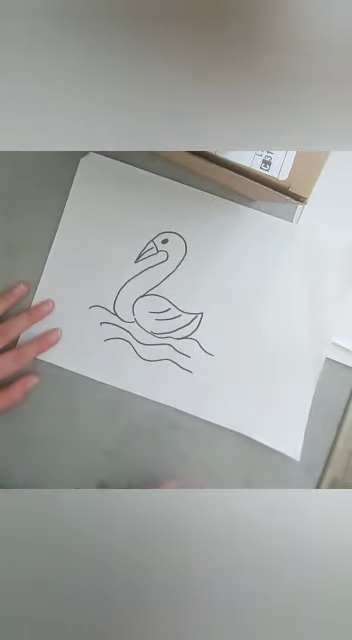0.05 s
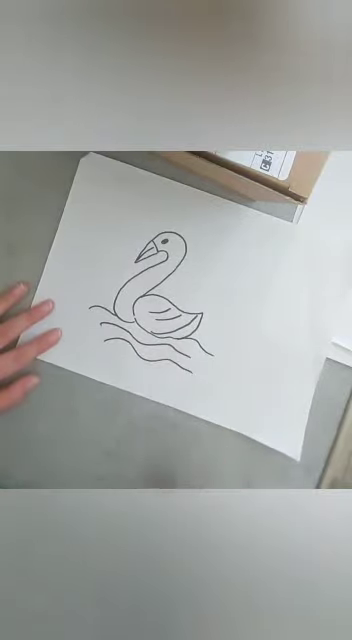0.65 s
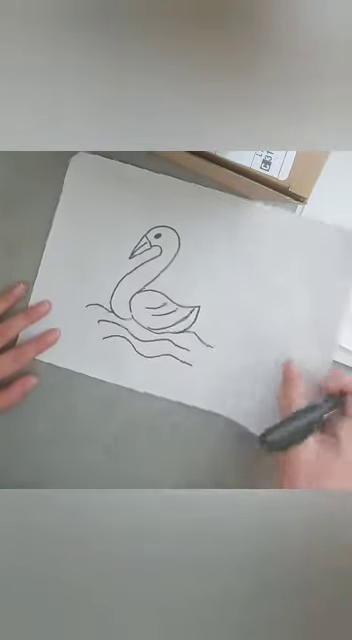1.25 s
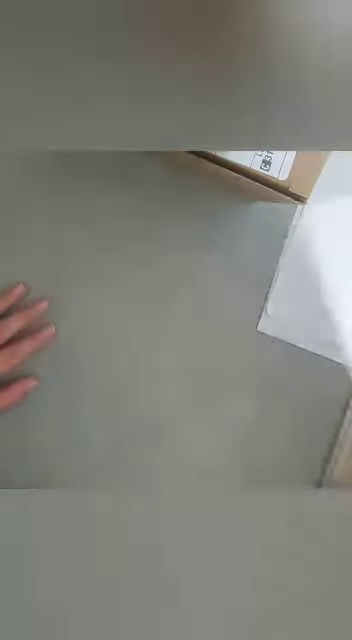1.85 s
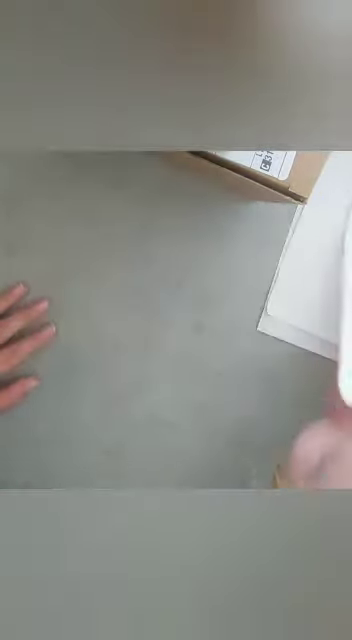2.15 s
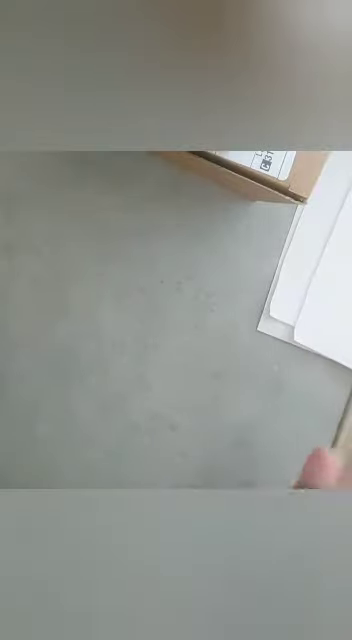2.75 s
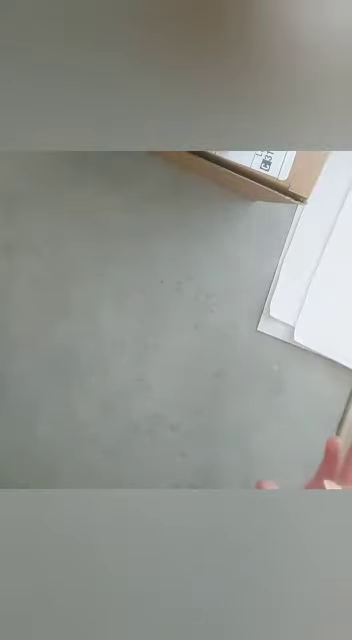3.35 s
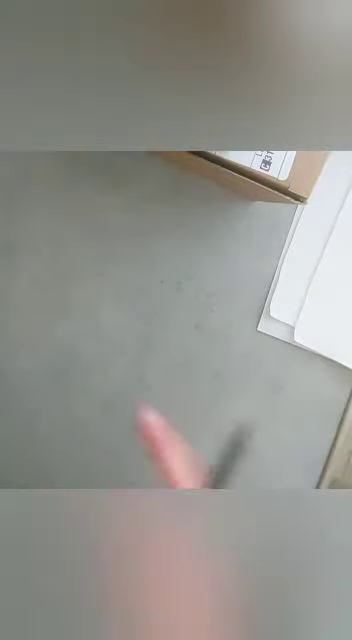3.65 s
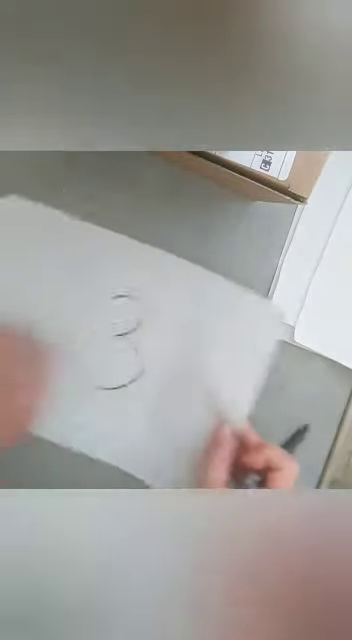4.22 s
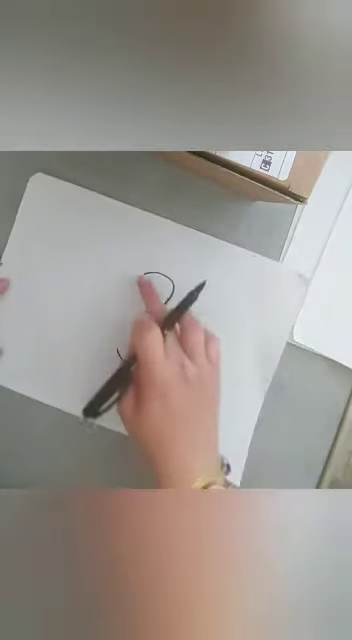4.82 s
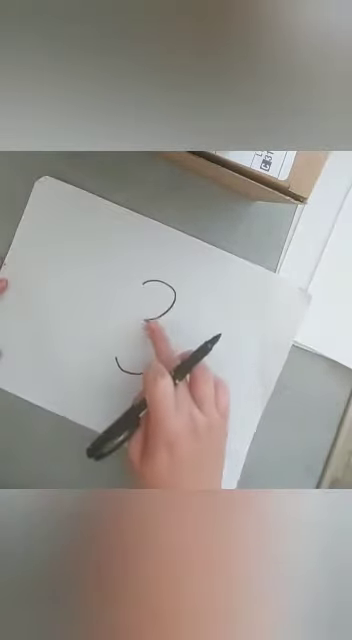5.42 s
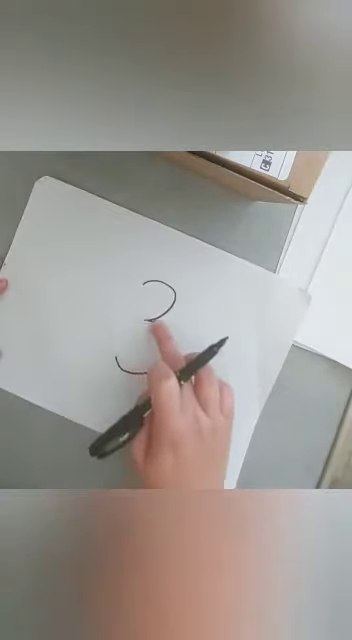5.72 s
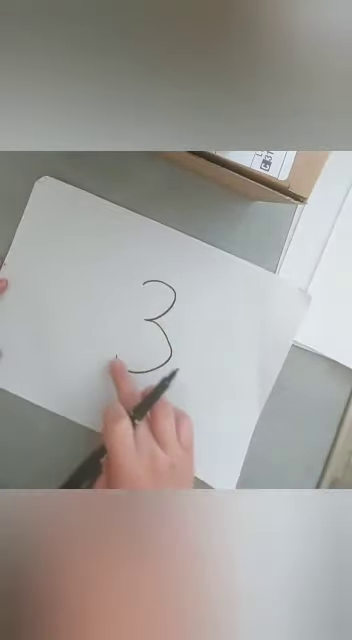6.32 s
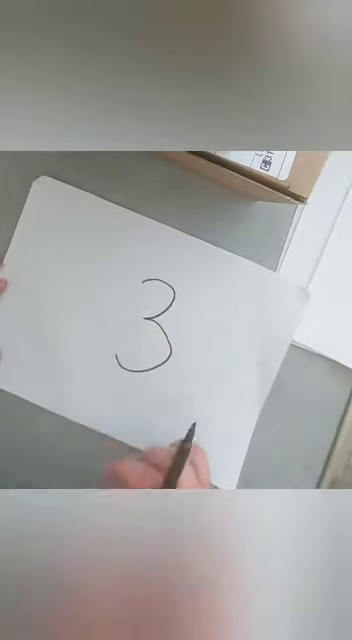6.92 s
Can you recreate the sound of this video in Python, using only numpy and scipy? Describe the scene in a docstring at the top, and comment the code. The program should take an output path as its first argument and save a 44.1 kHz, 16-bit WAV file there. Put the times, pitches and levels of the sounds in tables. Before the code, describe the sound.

After a few faint brushes, a sheet of paper is pulled across a table with a loud swish, crackling and popping sharply twice as it bends. It settles on a pile with soft pats. Following a pause, a second sheet rustles down, and a fingertip rubs lightly over it. The paper is close and a little left of the microphone, in a small room with a low rumble.

```python
"""A sheet of drawing paper is pulled off a table, swung aside and slid onto a pile, hissing by friction.
On the way it buckles twice with a sharp pop, and small creases crack as they release elastic energy.
A second sheet is fetched, laid down with soft puffs of air and smoothed; a fingertip traces over it.
The paper is close and left of the microphone, in a small, fairly bare room with a low rumble."""
import sys
import numpy as np
from scipy import signal
from scipy.fft import rfft, irfft
from scipy.io import wavfile

SR = 44100
rng = np.random.default_rng(int(sys.argv[2]) if len(sys.argv) > 2 else 0)


def to_wav(s):
    """Save 16-bit WAV."""
    ch = np.atleast_2d(s).T  # columns
    pcm = np.round(np.clip(ch, -1, 1) * 32767)  # PCM
    wavfile.write(sys.argv[1], SR, pcm.astype(np.int16))


N = 311787
TIME = np.arange(N) / SR
CUTOFF_HZ = 15750

# The whole sheet buckles. Each row: time in seconds, pulse level in dB, pulse frequency in Hz,
# panel frequency in Hz, ring level in dB relative to the pulse, ring T60 in seconds.
BUCKLINGS = [(1.495, -5, 1796, 539.1, -13.5, 0.05), (1.6567, -7, 953, 1066, -16, 0.054)]


def sliding(drive_db, judder_db, flutter_db, level_db, direct_share, shadow_db):
    """Friction excites the sheet; it judders as a whole, and its bands flutter as it bends."""
    # Spectrum of sliding paper. Each row: frequency in Hz, relative density in dB.
    paper = [(130, -4), (230, -5), (310, 3), (410, -2.5), (550, 2.5), (750, 0), (1100, 1), (1550, -2.5),
             (2100, -2), (2800, -6), (3750, -4), (5000, -7), (6500, -9.5), (11000, -7.5), (15500, -13)]
    # Position of the sheet. Each row: time in seconds, left-minus-right level in dB.
    place = [(1.15, 2.5), (1.6, 2.5), (1.8, -1), (2.55, 2.5), (3.6, 0.5), (4.05, 3), (4.6, 1.5), (5.1, 5.5),
             (5.4, 3), (6.2, 5.5)]
    flex_hz, rub_hz, hiss_hz = 830, 2480, 8700
    flex_db, rub_db, hiss_db = drive_db
    judder = judder_db * drift(110)
    # The direct rubbing is heard grain by grain, its diffuse part as a wash unrelated left and right.
    grains = [np.sqrt(direct_share) * from_left(catches, pan_db=6)
              + np.sqrt(1 - direct_share) * rng.standard_normal((2, N))
              for catches in fibres(per_s=1500, spread_db=6.0, smooth=0.92)]
    out, sides = np.zeros((2, N)), np.array([[.5], [-.5]])
    for hz, part in bands(grains):
        if hz > paper[0][0]:
            low = at_hz([(flex_hz, 1), (rub_hz, 0)], hz)
            high = at_hz([(rub_hz, 0), (hiss_hz, 1)], hz)
            band_db = rub_db + low * (flex_db - rub_db) + high * (hiss_db - rub_db)
            sheet_power = from_db(band_db + at_hz(paper, hz) + level_db) ** 2
            gain = np.sqrt(sheet_power + fingertip(hz, level_db=5.5))
            shade = from_db(shadow_db * high * sides)  # treble diffracts less to the far side
            out += part * shade * gain * from_db(judder + flutter_db * drift(40))
    left_db, = in_time(place)
    return out * from_db(left_db * sides)


def friction():
    """Incoherent sources add in power: sweep and slides give flexing, rubbing and hiss levels in dB."""
    # The first sheet is pulled, swung and slid onto the pile. Each row: time in seconds,
    # rubbing level in dB, then sheet flexing and fibre hiss in dB relative to the rubbing.
    sweep = [(1.1, -62.5, -4, -20), (1.25, -56, -11.5, -6), (1.32, -42, -12, -9), (1.44, -38, -3, -15),
             (1.56, -34.5, -2, -5), (1.65, -34.5, -9.5, -7.5), (1.75, -38.5, 1.5, -12),
             (1.81, -48.5, -3.5, -15.5), (1.94, -60, -4.5, 0), (2.3, -61.5, -9, -4), (2.8, -88.5, -7, 5.5)]
    # Short slides. Each row: time of greatest speed, swell and fade in seconds, then levels as above.
    slides = [(.02, 0.11, .09, -71, -12, -2), (.99, 0.042, .06, -80, 5, -4),
              (1.09, 0.013, 0.016, -61.5, 4.5, -7), (1.137, 0.033, 0.037, -51.5, -16.5, 3),
              (1.193, 0.02, 0.025, -47, -7, -16), (1.595, .03, 0.043, -42, -16, 7.5),
              (1.996, 0.018, 0.02, -48.5, -7, -11), (2.418, .02, 0.037, -56, -13, -5),
              (2.58, .07, 0.062, -62, -22.5, 2.5), (3.577, 0.027, 0.044, -46, -18.5, -9.5),
              (3.625, 0.059, 0.048, -60, -4, 5.5), (3.701, 0.048, 0.085, -57.5, -3, -8),
              (3.905, 0.032, 0.15, -60.5, -13, 2), (4.013, 0.016, 0.076, -39.5, -10.5, -14),
              (4.051, 0.018, 0.02, -37.5, -20, -7.5), (4.235, 0.094, 0.15, -60.5, -7.5, 1.5),
              (4.31, .018, 0.05, -50.5, -13.5, -7), (4.5, 0.043, 0.057, -52, -13, -8),
              (4.68, 0.037, 0.064, -69, -17.5, 10), (5.41, 0.085, .052, -58, -20, -1.5),
              (7.02, 0.12, 0.18, -79.5, -3.5, 4)]
    rub_db, flex_db, hiss_db = in_time(sweep)
    sweeping = (TIME > sweep[0][0]) & (TIME < sweep[-1][0])
    power = from_db([rub_db + flex_db, rub_db, rub_db + hiss_db]) ** 2 * sweeping
    for s, swell_s, fade_s, db, flex, hiss in slides:
        power += np.outer(from_db([db + flex, db, db + hiss]) ** 2, movement(s, swell_s, fade_s))
    return 10 * np.log10(power + 1e-14)


def movement(s, swell_s, fade_s):
    """Friction power follows speed: it swells, peaks at time s and fades to rest."""
    away = np.maximum((s - TIME) / swell_s, (TIME - s) / fade_s)
    power, near = np.zeros(N), away < 8
    power[near] = np.exp(-2 * away[near] ** 1.2)  # exponent 1 is a pointed peak, 2 a round bell
    return power


def fibres(per_s, spread_db, smooth):
    """Stick-slip: fibres catch and let go, in uneven clicks on a bed of countless tiny ones."""
    sizes = from_db(spread_db * np.minimum(rng.exponential(1, N), 4))
    catches = rms_one(sizes * (rng.random(N) < per_s / SR))
    return rms_one(rng.standard_normal((2, N)) * np.sqrt(catches ** 2 + smooth ** 2))


def pops(crack_db, crack_t60, lowest_hz):
    """Snap-through buckling radiates an N-shaped pressure pulse, a panel ring and a short crackle."""
    # Modes of the bent panel. Each row: multiple of the panel frequency, relative level in dB.
    panel = [(.6, -2), (.96, 3), (1.08, -2.5)]
    out = np.zeros(N)
    for s, level_db, pulse_hz, panel_hz, ring_db, t60 in BUCKLINGS:
        age = np.maximum(TIME - s, 0)
        phase = 2 * np.pi * pulse_hz * (TIME - s)
        pulse = phase * np.exp((1 - phase ** 2) / 2)
        modes = sum((-1) ** k * from_db(db) * np.sin(2 * np.pi * multiple * panel_hz * age)
                    for k, (multiple, db) in enumerate(panel))
        ring = modes * from_db(ring_db - 60 * age / t60)
        noise = rms_one(band(rng.standard_normal(N), 250, 1.6 * pulse_hz))  # faster flips are brighter
        crack = noise * (age > 0) * from_db(crack_db - 60 * age / crack_t60)
        out += from_db(level_db) * (pulse + ring + crack)
    # Air slips round the edges, so a sheet radiates no deep bass.
    return signal.sosfilt(signal.butter(2, lowest_hz, "high", fs=SR, output="sos"), out + 1e-18)


def thumps(hz, level_db, t60):
    """Each buckling displaces the air under the whole sheet: a low damped sinusoid."""
    out = np.zeros(N)
    for s, pulse_db, *_ in BUCKLINGS:
        age = np.maximum(TIME - s, 0)
        out += np.sin(2 * np.pi * hz * age) * from_db(pulse_db + level_db - 60 * age / t60)
    return out


def crinkles(width, top_db, first_t60, run_t60, delay_s):
    """A yielding crease releases elastic energy in one sharp crack and a dying run of smaller ones."""
    # Each row: time in seconds, body peak in dB, body centre in Hz,
    # treble peak in dB before top_db is added, first crack in dB relative to the run.
    creases = [(1.432, -20, 1860, -30, 9), (1.5007, -21.5, 1290, -22, 10), (1.5367, -17.5, 3020, -43, 19.5),
               (1.7312, -27, 1500, -37, -4), (1.995, -40.5, 2340, -47, -1.5),
               (2.6378, -43.5, 6490, -59.5, 7.5), (3.8923, -44, 8420, -57, 2.5),
               (4.0122, -24.5, 1970, -46, 9), (4.196, -42, 11900, -66, -2),
               (4.2856, -36.5, 3520, -64, -1.5), (4.6271, -43, 9760, -40.5, 4),
               (4.6501, -47, 10800, -46, 10.5), (4.674, -44, 9020, -58.5, 8), (6.8037, -61, 8650, -65, 4)]
    out, age = np.zeros(N + SR), np.arange(SR // 5) / SR
    for s, body_db, hz, crisp_db, first_db in creases:
        envelope = from_db(-60 * age / run_t60) + from_db(first_db - 60 * age / first_t60)
        cracks = rng.standard_normal((2, len(age))) * envelope
        body = band(band(cracks[0], hz / width, hz * width, order=1), 400, 4 * hz)
        top = band(cracks[1], 6800, CUTOFF_HZ)
        start = round((s + delay_s) * SR)
        for part, db in ((body, body_db), (top, crisp_db + top_db)):
            out[start:start + len(age)] += from_db(db) * part / np.abs(part).max()
    return out[:N]


def pats(width, rise_s):
    """A soft landing squeezes out air: a hollow puff of damped noise round one frequency."""
    # Hands and sheets land. Each row: start in seconds, peak in dB, centre in Hz, T60 in seconds.
    landings = [(1.069, -34.5, 4330, 0.024), (1.384, -36, 2104, 0.032), (1.848, -36, 1220, .042),
                (2.202, -45.5, 1650, 0.048), (2.574, -48.5, 3470, 0.057), (3.749, -42, 1110, 0.062),
                (4.098, -40, 2100, 0.027), (4.286, -37.5, 2280, 0.052), (4.483, -43, 2640, 0.022),
                (4.5427, -39.5, 3200, 0.053), (5.187, -54, 2300, .06)]
    out, age = np.zeros(N + SR), np.arange(SR // 4) / SR
    for s, peak_db, hz, t60 in landings:
        push = rng.standard_normal(len(age)) * (1 - np.exp(-age / rise_s)) * from_db(-60 * age / t60)
        puff = band(band(push, hz / width, hz * width, order=1), 400, 3 * hz)
        start = round(s * SR)
        out[start:start + len(age)] += from_db(peak_db) * puff / np.abs(puff).max()
    return out[:N]


def crackle(rub_db, per_s, level_db, spread_db, t60, low_hz):
    """A moving sheet gives off tiny snaps as a Poisson process, as strong as it is rubbed."""
    onsets = rng.random(N) < per_s / SR
    snaps = onsets * from_db(spread_db * rng.uniform(-1, 1, N) + rub_db + level_db)
    decay = from_db(-60 * np.arange(SR // 50) / SR / t60)
    envelope = np.abs(signal.fftconvolve(snaps, decay)[:N])
    return band(envelope * rng.standard_normal(N), low_hz, CUTOFF_HZ, order=1)


def fingertip(hz, level_db):
    """Skin friction on flat paper makes a high swish; this is its power over time in the band at hz."""
    # Each row: time of greatest speed, swell and fade in seconds, relative level in dB, pitch in Hz.
    strokes = [(.61, 0.024, 0.026, -80, 8000), (.75, 0.077, .03, -79, 8000), (.86, .03, 0.055, -72, 8000),
               (1.045, 0.029, 0.036, -62.5, 6360), (3.335, 0.048, 0.13, -67, 7760),
               (3.5, .03, 0.036, -69, 7480), (4.83, 0.036, .022, -67.5, 7000),
               (4.961, 0.042, .06, -75.5, 7000), (5.085, 0.034, 0.036, -55.5, 4830),
               (5.17, 0.11, 0.085, -60, 3200), (5.389, 0.026, 0.026, -47, 3900),
               (5.75, 0.053, .03, -77.5, 7500), (6.04, 0.1, 0.26, -78.5, 6300),
               (6.3, .17, 0.1, -75.5, 6900), (6.875, .022, 0.046, -72, 7000)]
    power = np.zeros(N)
    for s, swell_s, fade_s, db, swish_hz in strokes:
        octaves = np.log2(hz / swish_hz)
        slope = 18 if octaves < 0 else -2.5  # dB per octave
        power += from_db(db + level_db + slope * octaves) ** 2 * movement(s, swell_s, fade_s)
    return power


def room(x, tail_db):
    """Early reflections and a diffuse tail, which absorption makes decay exponentially in each band."""
    # Nearby surfaces. Each row: delay in seconds, level in dB.
    echoes = [(.0026, -14.5), (.0071, -17), (0.0145, -13.5)]
    # Reverberation time. Each row: frequency in Hz, T60 in seconds.
    t60 = [(150, 0.12), (500, 0.22), (1100, 0.25), (3000, 0.23), (8000, 0.24), (15000, 0.25)]
    # Spectrum of the tail. Each row: frequency in Hz, relative level in dB.
    colour = [(100, -10), (400, -3.5), (1100, 0.5), (3000, -3.5), (8000, 0.5), (15000, -15.5)]
    age = np.arange(SR * 3 // 5) / SR
    tail = sum(noise * from_db(at_hz(colour, hz) - 60 * age / at_hz(t60, hz))
               for hz, noise in bands(rng.standard_normal((2, 2, len(age)))))
    tail *= 1 - np.exp(-age / 0.00057)
    response = from_db(tail_db) * tail / np.sqrt(np.sum(tail ** 2) / 2)
    for delay, db in echoes:
        for channel, offset in enumerate(rng.uniform(-.0004, .0004, 2)):
            response[channel, round((delay + offset) * SR)] += from_db(db)
    return signal.fftconvolve(x[None], response, axes=1)[:, :N]


def background(hum_hz, hum_db, waver_db, hiss_db):
    """Ambient noise: the building's rumble and a hum modulated in phase and level, with a faint hiss."""
    # Swell of rumble and hum. Each row: time in seconds, relative level in dB.
    swell = [(0, -61.5), (.35, -54), (.6, -63.5), (1, -52.5), (1.25, -58.5), (1.55, -50), (2.25, -61),
             (3.45, -63), (4.05, -60), (4.7, -62.5), (5.15, -57.5), (5.53, -69), (6.2, -60), (6.7, -69),
             (7.07, -62.5)]
    # Spectra of the rumble and the steady hiss. Each row: frequency in Hz, relative density in dB.
    rumble_spectrum = [(25, -25.5), (45, -13), (70, -5), (100, -1), (135, -3), (200, -13.5), (280, -15),
                       (400, -37), (700, -49)]
    hiss_spectrum = [(300, 8), (700, 5.5), (1200, -2), (3000, -6.5), (7000, -11), (11000, 0), (15500, -8)]
    swell_db, = in_time(swell)
    hum = np.sin(2 * np.pi * hum_hz * TIME + 0.55 * drift(2.7))
    hum *= from_db(hum_db + waver_db * drift(6.9))
    rumble = from_db(swell_db - 0.72) * (coloured_noise(rumble_spectrum, correlation=0.89) + hum)
    hiss = from_db(hiss_db) * coloured_noise(hiss_spectrum, correlation=0.06)
    return (rumble + hiss) * from_db([[-.6], [.6]])


def coloured_noise(spectrum, correlation):
    """Spectrally shaped stereo noise of rms 1; the mid-to-side ratio sets the left-right correlation."""
    hz = np.arange(N // 2 + 1) * SR / N + 1
    gain = from_db(at_hz(spectrum, hz)) / (1 + (hz / (2 * spectrum[-1][0])) ** 2)
    mid, side = irfft(rfft(rng.standard_normal((2, N))) * gain, N)
    return rms_one(np.sqrt(1 + correlation) * mid + np.sqrt(1 - correlation) * side * [[1], [-1]])


def from_left(x, pan_db, lag_s=.00039):
    """Path difference: direct sound from the left reaches the right channel later and weaker."""
    return np.array([x * from_db(pan_db / 2), np.roll(x, round(lag_s * SR)) * from_db(-pan_db / 2)])


def from_db(db):
    """Decibels to amplitude ratio."""
    return 10 ** (np.asarray(db) / 20)


def rms_one(x):
    """Normalise to rms 1."""
    return x / np.sqrt(np.mean(x ** 2) + 1e-20)


def in_time(rows):
    """Interpolate each column after the time column at every sample."""
    s, *columns = np.transpose(rows)
    return [np.interp(TIME, s, column) for column in columns]


def at_hz(points, hz):
    """Interpolate a curve on a log-frequency axis."""
    frequencies, values = np.transpose(points)
    return np.interp(np.log(hz), np.log(frequencies), values)


def drift(per_s):
    """Random modulation of rms 1 that changes course per_s times a second."""
    knots = rng.standard_normal(4096)
    return rms_one(np.interp(TIME * per_s, np.arange(len(knots)), knots))


def band(x, low, high, order=2):
    """Butterworth band-pass between low and high Hz."""
    sos = signal.butter(order, [low, min(high, .45 * SR)], "band", fs=SR, output="sos")
    return signal.sosfilt(sos, x + 1e-18)


def bands(pair):
    """Filter bank yielding (centre Hz, band); two unrelated inputs alternate, so neighbours add in power."""
    edges = 22 * 2 ** np.arange(0, 9.9, .4)
    for k, (low, high) in enumerate(zip(edges, edges[1:])):
        yield np.sqrt(low * high), band(pair[k % 2], low, high)


def scene():
    """Superposition of the paper's direct sound, its reflections and the room's ambient noise."""
    drive_db = friction()
    slide = sliding(drive_db, judder_db=1.71, flutter_db=2, level_db=11.5, direct_share=.073, shadow_db=2)
    pop = pops(crack_db=-16.5, crack_t60=.03, lowest_hz=110) + thumps(hz=165, level_db=-29, t60=.09)
    touch = crinkles(width=1.41, top_db=6.5, first_t60=.0036, run_t60=.029, delay_s=.0016)
    touch += pats(width=1.3, rise_s=.0012)
    touch += crackle(rub_db=drive_db[1], per_s=70, level_db=-1.5, spread_db=6.5, t60=.0033, low_hz=1800)
    direct = slide + from_left(pop, pan_db=8) + from_left(touch, pan_db=13)
    into_room = from_db(-3) * slide.mean(axis=0) + from_db(-2.5) * pop + from_db(2) * touch
    reflected = room(into_room, tail_db=-4.5)
    return direct + reflected + background(hum_hz=102.4, hum_db=-1.5, waver_db=2, hiss_db=-78)


def record(dry):
    """Hard clipping flattens the highest peaks; an elliptic low-pass limits the bandwidth."""
    low_pass = signal.ellip(10, .1, 70, CUTOFF_HZ, fs=SR, output="sos")
    return signal.sosfilt(low_pass, np.clip(dry, -.94, .94))


dry = scene()
out = record(dry)
to_wav(out)
```